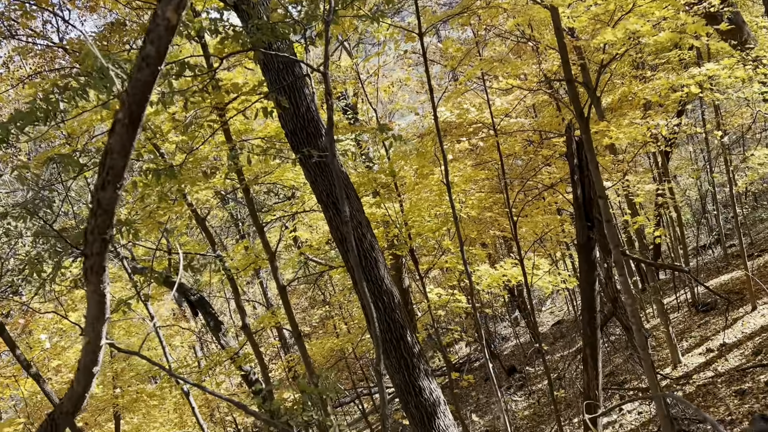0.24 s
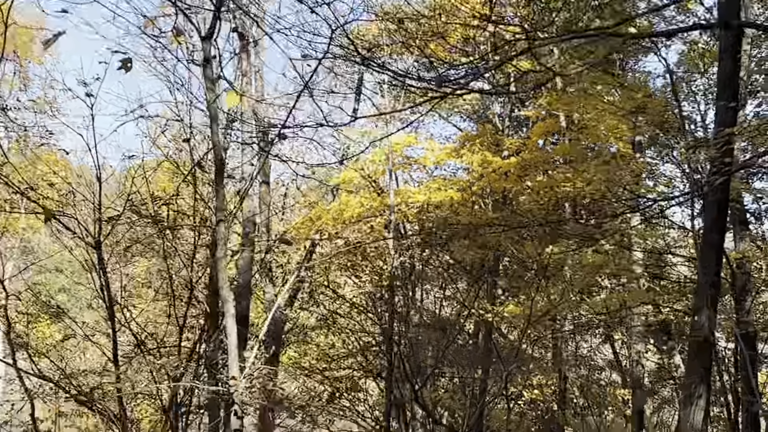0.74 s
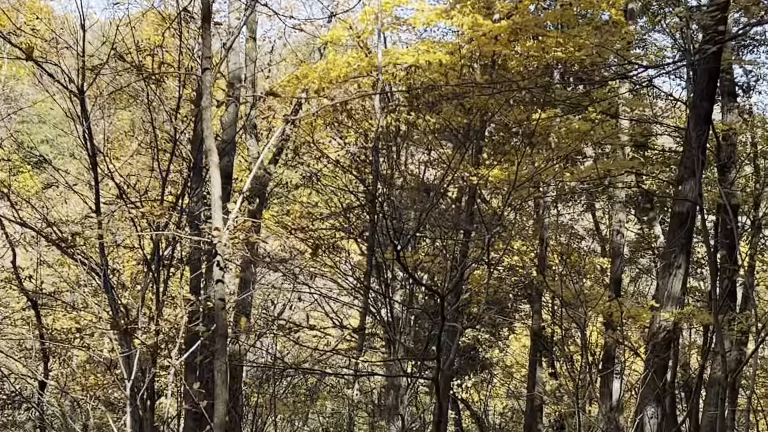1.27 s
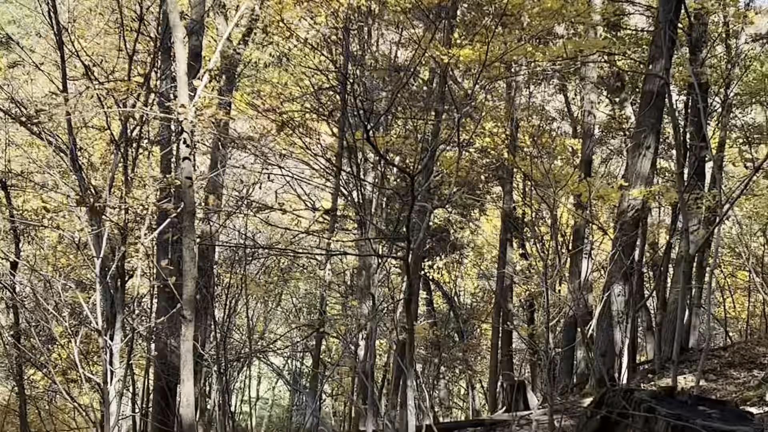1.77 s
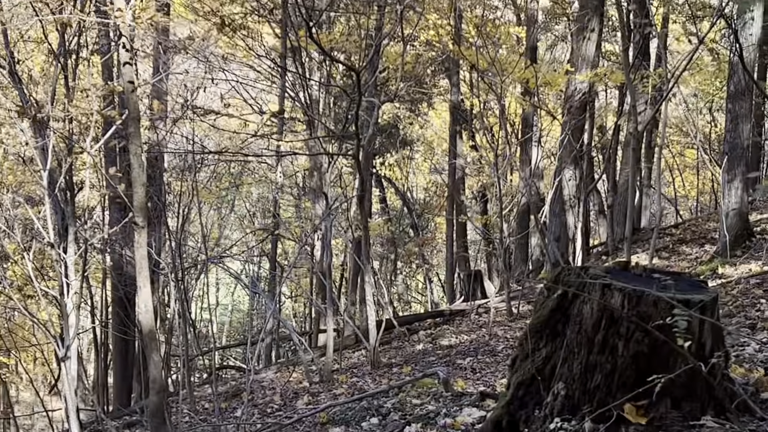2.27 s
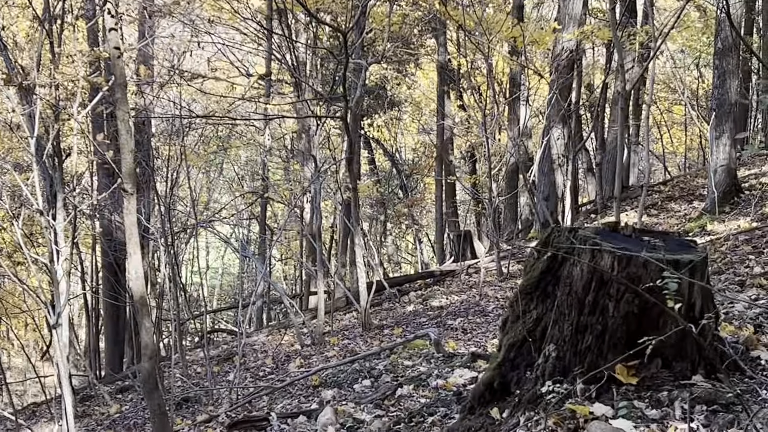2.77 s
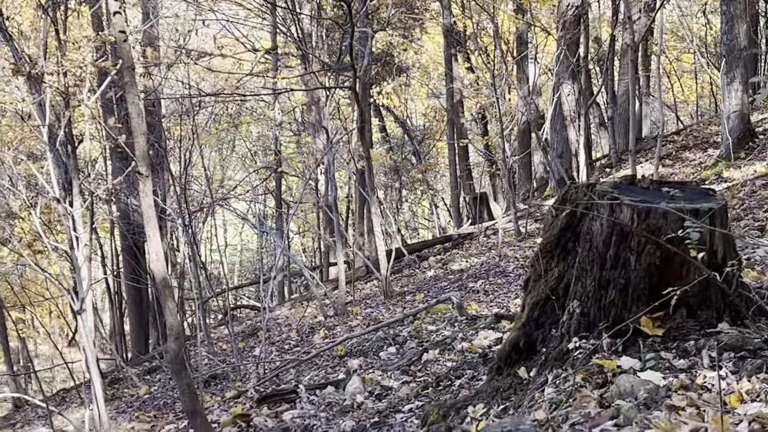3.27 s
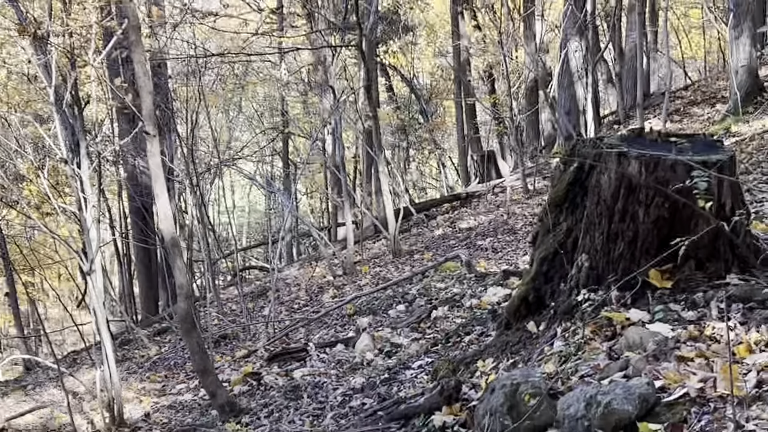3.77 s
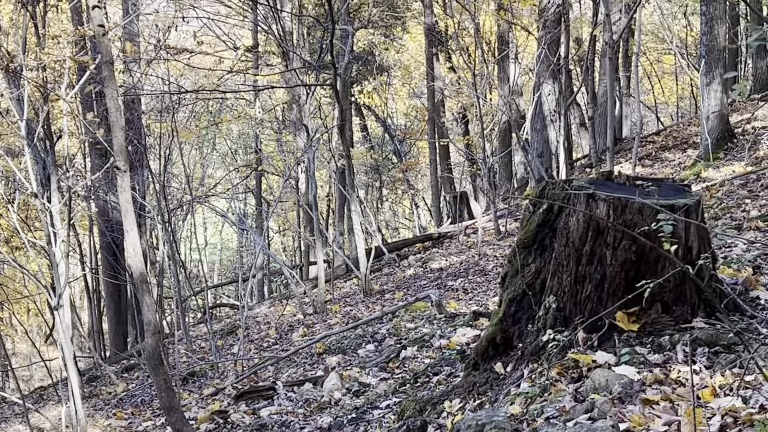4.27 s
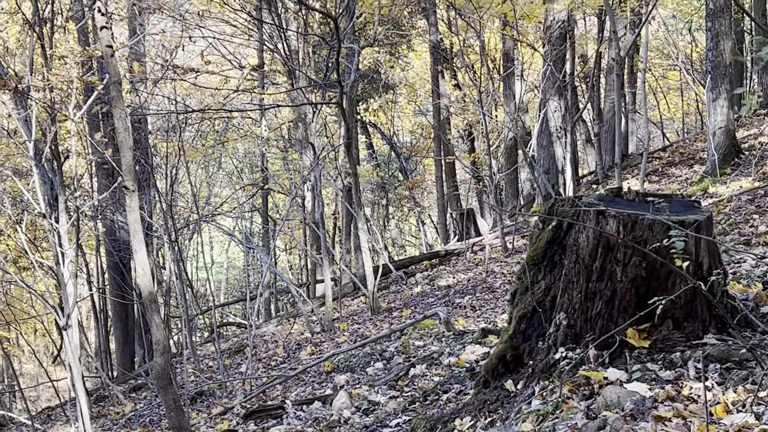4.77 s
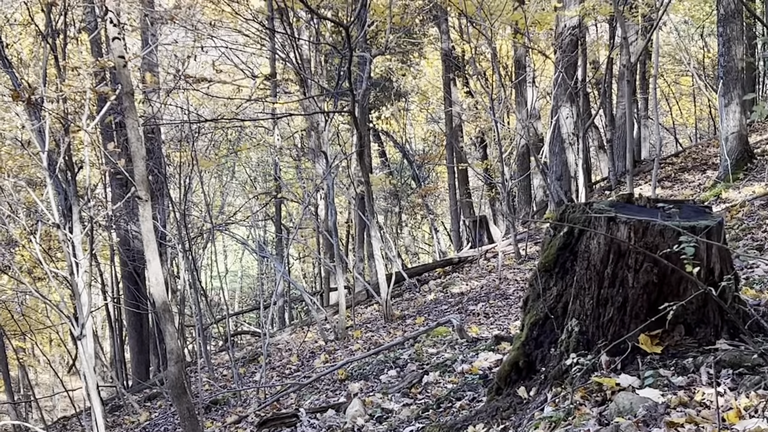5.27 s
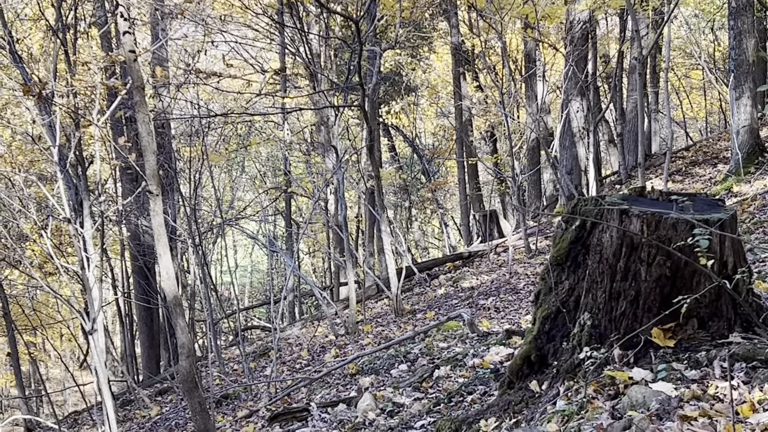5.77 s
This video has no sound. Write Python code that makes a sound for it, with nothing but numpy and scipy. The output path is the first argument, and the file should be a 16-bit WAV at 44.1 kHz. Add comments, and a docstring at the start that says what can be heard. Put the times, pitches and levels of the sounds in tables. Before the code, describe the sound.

A burst of leaf crunching, bright and wide, ends suddenly. In the hush, fingers shift on a hollow hand-held device: muffled thumps, light taps, a palm rub, fabric brushing. A strong knock and snap break the quiet, later two more strong knocks, the second snapping, with a softer bump just after. A tiny far bird note and faint ticks follow before it settles almost silent. Open woods, no audible echo, handling noise very near the microphone.

```python
"""Dry leaves rustle and crunch close by in autumn woods, and the rustle breaks off abruptly: mottled grains and
noise. In the quiet after, a sleeve brushes softly (three noise bands) and the shifting grip knocks on the
hollow case of a hand-held camera (swelling modes), twice with a sharp snap (filtered random signs). Twigs tick
(short noise bursts), a palm slides and a thin far bird note sounds (shaped noise). Faint far air and a low grip
rumble lie under the quiet (coloured noise)."""
import sys
import numpy as np
from scipy import signal
from scipy.fft import rfft, irfft, next_fast_len
from scipy.io import wavfile
from scipy.ndimage import map_coordinates

SR = 44100
rng = np.random.default_rng(int(sys.argv[2]) if len(sys.argv) > 2 else 0)


def pcm_store(signal):
    """Save signal as 16-bit PCM."""
    levels = np.round(np.clip(np.atleast_2d(signal), -1, 1) * 32767)
    wavfile.write(sys.argv[1], SR, levels.astype(np.int16).T)


N = 266364
TIME = np.arange(N) / SR

# low rumble spectrum: f/Hz, relative level/dB
RUMBLE_COLOUR = [(20, -24.5), (40, -13), (58, -8), (82, -1.5), (105, -3.5), (128, -1), (162, -12.5),
                 (200, -10.5), (245, -11.5), (320, -24), (700, -54)]
# stereo width of leaves and woody ticks: f/Hz, side re mid/dB
LEAF_WIDTH = [(60, -22), (200, -13.5), (700, -6), (1300, -3.5), (6500, -2.5), (11000, -1), (13500, -5),
              (15500, -13)]
# stereo width of the quieter sounds: f/Hz, side re mid/dB
QUIET_WIDTH = [(60, -16.5), (250, -16), (600, -8.5), (1100, -4.5), (2200, -17.5), (7000, -15.5), (11000, 1),
               (13500, -12), (15500, -5.5)]


def from_db(db):
    """Decibels to amplitude gain."""
    return 10 ** (np.asarray(db) / 20)


def rms_one(x):
    """Scale to unit power."""
    return x / np.sqrt(np.mean(x ** 2) + 1e-20)


def gains(rows):
    """One gain curve per dB column, linear in dB between the times."""
    time_s, *columns_db = np.transpose(rows)
    return [from_db(np.interp(TIME, time_s, column_db)) for column_db in columns_db]


def coloured(x, points):
    """Zero-phase filter by a (f/Hz, level/dB) curve, interpolated over log frequency."""
    hz, db = np.transpose(points)
    size = next_fast_len(N + SR // 20, real=True)
    bins_hz = np.maximum(np.arange(size // 2 + 1) * SR / size, 1)
    response = from_db(np.interp(np.log(bins_hz), np.log(hz), db))
    return irfft(rfft(x, size) * response, size)[..., :N]


def cut(x, hz, kind, order=2):
    """Causal Butterworth low- or high-pass."""
    sos = signal.butter(order, np.clip(hz, 10, .45 * SR), kind, fs=SR, output="sos")
    return signal.sosfilt(sos, x + 1e-18)


def drift(knots_per_s):
    """Slow random curve: lines between unit-variance normal knots."""
    knots = rng.standard_normal(4000)
    return np.interp(TIME * knots_per_s, np.arange(len(knots)), knots)


def hiss():
    """Two independent white noises, as mid and side."""
    return rng.standard_normal((2, N))


def grains(per_s, spread_db):
    """Tiny random fractures of uneven size, each from a direction of its own."""
    out = np.zeros((2, N))
    born = np.flatnonzero(rng.random(N) < per_s / SR)
    sizes = from_db(spread_db * np.minimum(rng.exponential(1, N), 4))
    out[:, born] = (sizes * hiss())[:, born]
    return rms_one(out)


def mottled(x, patchy_db, patches_per_s, count):
    """Narrow bands swell and sink on their own, as different leaves and fibres take turns."""
    spectrum = signal.stft(x, nperseg=512)[2]
    rows, frames = spectrum.shape[1:]
    band_place = count * np.sqrt(np.arange(rows) / rows)
    time_place = np.linspace(0, patches_per_s * N / SR, frames)
    place = np.meshgrid(band_place, time_place, indexing="ij")
    patches = map_coordinates(rng.standard_normal((count + 1, 2000)), place, order=1)
    return signal.istft(spectrum * from_db(patchy_db * patches))[1][:, :N]


def stereo(pair, colour, width):
    """Colour a mid/side pair and open it to left/right; the mid has unit power."""
    mid, side = coloured(pair, colour)
    return rms_one(mid) + coloured(rms_one(side), width) * [[1], [-1]]


def burst(start_s, decay_s):
    """Envelope that jumps to one and decays exponentially."""
    out, start = np.zeros(N), int(start_s * SR)
    age_s = TIME[:min(N - start, SR // 4)]
    out[start:start + len(age_s)] = np.exp(-age_s / decay_s)
    return out


def stroke(centre_s, half_s):
    """Envelope that swells to one and fades; half height at centre_s +/- half_s."""
    return 1 / (1 + np.square((TIME - centre_s) / half_s) ** 2)


def leaves():
    """Strides crush leaves that crackle in clumps; dull crunch and rumble of moving follow more gently."""
    # two strides: start/s, end/s, crackle level at end before waver/dB
    strides = [(-.03, 0.3, -54), (0.406, 0.573, -51)]
    # crackle spectrum: f/Hz, relative level/dB
    crackle_colour = [(900, 1.5), (2000, 0), (3200, -3.5), (4500, -4.5), (7000, -7.5), (9000, -8),
                      (12500, -9), (15500, -17)]
    # crunch spectrum: f/Hz, relative level/dB
    crunch_colour = [(200, -12), (320, 1.5), (550, 3), (900, 5.5), (1250, -8), (1700, -2), (2400, -18),
                     (5000, -61)]
    attack_s, release_s = 0.0045, 0.039
    press_db_per_s = 13  # a stride grows as the weight comes down
    crackle = from_db(-64)  # leaves dragged along between the strides
    for start_s, end_s, db in strides:
        attack = np.clip((TIME - start_s) / attack_s, 0, 1)
        release = np.exp(-np.maximum(TIME - end_s, 0) / release_s)
        press = from_db(db - press_db_per_s * np.maximum(end_s - TIME, 0))
        crackle = crackle + attack * release * press

    effort = crackle / from_db(-53)
    # exponents: share of the crackle's dB swing that is followed
    crunch = from_db(-53.5) * effort ** 0.16
    rumble = from_db(-45) * effort ** 0.34

    fractures = grains(per_s=2000, spread_db=2.5) + 0.81 * hiss()
    fractures = mottled(fractures, patchy_db=4.0, patches_per_s=59, count=55)
    crackle_waver = from_db(-1.5 + 2.1 * drift(129.3))
    balance = from_db([[.4], [-1.4]])  # left, right
    out = crackle * crackle_waver * stereo(fractures, crackle_colour, LEAF_WIDTH) * balance

    crushing = grains(per_s=2200, spread_db=-2.0)
    crushing = mottled(crushing, patchy_db=4.5, patches_per_s=51.4, count=50)
    crunch_waver = from_db(-1.15 + 0.49 * drift(82.3))
    out += crunch * crunch_waver * stereo(crushing, crunch_colour, LEAF_WIDTH)
    return out + from_db(-1.5) * rumble * stereo(hiss(), RUMBLE_COLOUR, LEAF_WIDTH)


def ticks():
    """Breaking leaves and twigs give a short splintering crack and a woody tock."""
    # breaks: t/s, crack level before trim/dB, woody body level before trim/dB
    breaks = [(0.1323, -37.5, -60), (0.184, -42, -65), (.2753, -44, -59), (0.3351, -47.5, -56),
              (.413, -47, -53.5), (.5826, -43.5, -51.5), (1.07, -66.5, -69), (1.096, -62.5, -68),
              (1.16, -61, -74), (1.2731, -60.5, -54), (1.3252, -69, -63), (1.6045, -65, -57.5),
              (3.739, -70, -66), (4.7624, -57.5, -72), (4.7945, -59, -77), (4.927, -66, -71),
              (5.1, -72, -89), (5.413, -73, -74.5), (5.5015, -67.5, -86)]
    crack_colour = [(1000, 5.5), (2400, -1.5), (7000, -2.0), (15000, -9.5)]
    body_colour = [(400, -11), (1000, 13), (1300, 10), (1900, -3.5),
                   (3200, 0.5), (4300, -12), (9000, -51.5)]
    crack = sum(from_db(crack_db) * burst(s, 0.0043) for s, crack_db, body_db in breaks)
    body = sum(from_db(body_db) * burst(s, 0.0057) for s, crack_db, body_db in breaks)
    bright = stereo(hiss(), crack_colour, QUIET_WIDTH)
    woody = stereo(hiss(), body_colour, LEAF_WIDTH)
    return from_db(-1.5) * crack * bright + from_db(6.0) * body * woody


def knocks():
    """A soft finger feeds the case modes near its pitch; each mode swells, fades and lingers faintly."""
    # case modes by family; each: f/Hz, relative level/dB, swell time to peak/s
    case_modes = {"thump": [(54.3, -7.5, 0.027), (107, 2.5, 0.015)], "hollow": [(234.7, -5, 0.0087),
                  (343.6, -1, 0.0076)], "knock": [(460.7, 1.5, 0.0062), (705, -8, 0.0071)],
                  "ring": [(643, 1.5, 0.0058)], "rap": [(932, -5, 0.003), (1286, 0, .0038),
                  (1508, -2, 0.0044)]}
    # finger contacts: t/s, strength/dB, most-fed pitch/Hz, fall below pitch/(dB/octave),
    # boost of the "knock" family by the spot hit/dB
    contacts = [(.439, -43.5, 643, 12.5, -16), (.9, -56, 587, 12, -12), (1.093, -48.5, 121, 1.5, 0),
                (1.136, -53.5, 240, 2.1, 5), (1.208, -51.5, 280, 2.2, 0.5), (1.324, -54, 110, 1, 7),
                (1.408, -49.5, 109, 1.5, 2), (1.505, -38.5, 240, 4.5, -15), (1.85, -51, 315, 6, 9.5),
                (2.2065, -21, 398, 3.5, -22.5), (2.233, -26, 218, 3, -6.5), (2.895, -56.5, 577, 3.5, -5),
                (3.007, -53.5, 346, 2.5, -7), (3.559, -57.5, 517, 3, -10), (3.6406, -20.5, 538, 6, -2.5),
                (3.655, -31.5, 334, 6, -12.5), (3.747, -53, 1017, 4.5, 0.5), (3.8483, -22, 731, 3.5, 8),
                (3.873, -30.5, 148.2, 2, 15), (4.075, -44.5, 640, 2.5, 16), (4.082, -28.5, 643, 11, -6.5),
                (4.088, -38, 107, 4, -0.5), (4.099, -36.5, 622, 13, -1), (4.183, -52.5, 110, 2, 7),
                (4.657, -54.5, 380, 7, 2), (4.847, -57.5, 643, 12.5, -19), (5.234, -51, 521, 6, 4.5)]
    upper_fall = 3.8  # slope above pitch re slope below
    out, age_s = np.zeros(N), TIME[:SR // 3]
    for family, modes in case_modes.items():
        for hz, db, swell_s in modes:
            swell = (age_s / swell_s * np.exp(1 - age_s / swell_s)) ** 2
            linger = from_db(-32.0) * (1 - np.exp(-age_s / swell_s)) * np.exp(-age_s / 0.042)
            ring = from_db(db) * (swell + linger) * np.sin(2 * np.pi * hz * age_s)
            for s, strength_db, pitch_hz, fall_db, spot_db in contacts:
                octaves = np.log2(hz / pitch_hz)
                fed_db = strength_db - fall_db * max(-octaves, upper_fall * octaves)
                fed_db += spot_db * (family == "knock")
                start = int(s * SR)
                out[start:start + len(age_s)] += from_db(fed_db) * ring
    # the two ports feel the bass alike and the upper modes out of step
    side_colour = [(50, -14.0), (100, -20.5), (350, -18.0), (460, -10.0), (640, -7.0), (1300, -9.5)]
    side = coloured(signal.hilbert(out).imag, side_colour)
    return out + side * [[1], [-1]]


def quiet_woods():
    """The hand rumbles on the case and far air murmurs, as wavering noise over a faint steady hiss."""
    # background: t/s, rumble level before trim/dB, airy murmur level before trim/dB
    background = [(0.66, -74.5, -73.5), (0.76, -76, -75), (0.96, -70.5, -73.5), (1.23, -61, -69.5),
                  (1.77, -71, -69.5), (2.12, -67.5, -66), (2.29, -70.5, -71), (2.53, -73, -71),
                  (2.84, -75.5, -67.5), (3.22, -75.5, -68.5), (3.8, -69.5, -67.5), (3.92, -72, -68),
                  (4.04, -69, -74), (4.49, -75.5, -71), (4.76, -71, -71.5), (5.07, -75.5, -73),
                  (5.57, -82, -80.5), (6.03, -79, -75.5)]
    # murmur spectrum: f/Hz, relative level/dB
    air_colour = [(120, -11.5), (260, -8), (380, 3), (620, -2.5), (800, -5), (950, -5.5), (1120, -16.5),
                  (1400, -13.5), (2000, -32.5), (4000, -57.5)]
    # hiss spectrum: f/Hz, relative level/dB
    hiss_colour = [(150, -7.5), (600, -2), (1000, 3), (1400, 4.5), (2000, -8), (3000, -15), (7000, -18),
                   (9000, -23), (13000, -22), (15500, -34.5)]
    grip, air = gains(background)
    grip_waver = from_db(4.0 + 3.5 * drift(11))
    out = grip_waver * grip * stereo(hiss(), RUMBLE_COLOUR, QUIET_WIDTH)
    air_waver = from_db(2 + 1.5 * drift(23))
    out += air_waver * air * stereo(hiss(), air_colour, QUIET_WIDTH)
    return out + from_db(-77) * stereo(hiss(), hiss_colour, QUIET_WIDTH)


def sleeve():
    """Strokes swell and fade while fibres catch and let go; brightness tilts three grains of noise."""
    # strokes: centre t/s, half length/s, level before grain offset and trim/dB, brightness/(dB/grain band)
    brushes = [(0.693, 0.069, -79, -3), (.88, 0.041, -80, -5), (1.215, 0.065, -82, -6.5),
               (1.355, 0.034, -70, -2), (1.553, 0.081, -77.5, -8), (1.772, 0.046, -79, 6),
               (1.9, .04, -89.5, -17.5), (2.728, 0.057, -88.5, 5), (3.025, .04, -82, -7),
               (3.2, 0.05, -76.5, -7), (3.384, 0.05, -80.5, -14.5), (3.59, 0.12, -89.5, -15),
               (4.764, .058, -76, 1), (4.955, 0.04, -73.5, -3), (5.046, .055, -74.5, 2.5),
               (5.21, 0.089, -86.5, 6.5), (5.426, .035, -86, -6), (5.555, .025, -88.5, -10),
               (5.792, .018, -84.5, 3.5), (5.977, 0.036, -76, -9)]
    # coarse, middle and fine grain: low f/Hz, high f/Hz
    grain_bands = [(1200, 3000), (4700, 8200), (11400, 15000)]
    # offset of each grain: level/dB
    grain_db = [1.5, 0.5, 0]
    out = 0
    strokes = [(stroke(centre_s, half_s), db, bright_db) for centre_s, half_s, db, bright_db in brushes]
    fibres = hiss() + 0.95 * grains(per_s=1000, spread_db=3.5)
    fibres = mottled(fibres, patchy_db=4.0, patches_per_s=22, count=60)
    for step, (low_hz, high_hz) in enumerate(grain_bands):
        level = 0
        for shape, db, bright_db in strokes:
            level = level + from_db(db + grain_db[step] + (step - 1) * bright_db) * shape
        band = [(low_hz / 1.5, -20), (low_hz, 0), (high_hz, -3), (high_hz * 1.55, -22)]
        out = out + level * stereo(fibres, band, QUIET_WIDTH)
    return out * from_db(-5.0 + 1.0 * drift(54))


def slides():
    """The sliding palm rubs the case's low resonances: noise shaped to their spectrum."""
    # palm slides: centre t/s, half length/s, level/dB
    rubs = [(1.945, 0.046, -63), (2.78, .07, -67), (3.426, .022, -58), (4.19, 0.11, -60.5),
            (5.261, 0.054, -64)]
    # rub spectrum: f/Hz, relative level/dB
    rub_colour = [(60, -12), (105, 3), (170, -13.5), (350, -4.5), (460, 2.5), (550, -5), (645, 0.5),
                  (760, -14), (1400, -19.5), (2500, -48)]
    level = sum(from_db(db) * stroke(centre_s, half_s) for centre_s, half_s, db in rubs)
    return level * stereo(hiss(), rub_colour, QUIET_WIDTH)


def snaps():
    """A hard catch cracks briefly, as filtered random signs, and leaves a faint scatter behind."""
    # snaps of the case: t/s, drive before filters/dB, low-pass edge f/Hz, decay/s
    catches = [(2.2049, -21, 1480, 0.00045), (2.2058, -12.5, 1380, 0.0009), (2.209, -37, 2500, 0.0007),
               (2.2252, -54.5, 4800, 0.00064), (3.641, -48.5, 990, 0.0056), (3.852, -19, 8000, 0.00046),
               (3.855, -41, 1000, .008)]
    # snap spectrum: f/Hz, gain/dB
    snap_colour = [(1000, -11.5), (1500, 3), (2000, 1.5), (2700, 7), (4500, -2.5), (7200, -0.5),
                   (9500, -4.5), (13000, -0.5), (16000, -1)]
    out = 0
    for s, db, edge_hz, decay_s in catches:
        scatter = from_db(-30.5) * burst(s, 0.0079) + from_db(-45.5) * burst(s, 0.047)
        envelope = burst(s, decay_s) + scatter
        out = out + from_db(db) * cut(envelope * np.sign(hiss()), edge_hz, "low", order=1)
    mid, side = coloured(cut(out, 610.0, "high"), snap_colour)
    return mid + from_db(-12.0) * side * [[1], [-1]]


def bird():
    """A thin high note, blurred by the trees into a narrow noise band."""
    # far bird note: t/s, level/dB
    note = [(4.63, -105), (4.68, -75.5), (4.75, -78), (4.79, -81), (4.82, -110)]
    note_colour = [(5200, -72.0), (6500, -12), (7000, -7.5), (7500, -15.5), (8800, -74.5)]
    level, = gains(note)
    return level * stereo(hiss(), note_colour, QUIET_WIDTH)


def scene():
    """The rustle gives way to the quiet; the other sounds add to both."""
    rustle_end_s, fade_s = .624, 0.0033
    rustling = np.clip((rustle_end_s - TIME) / fade_s, 0, 1)
    ground = rustling * leaves() + (1 - rustling) * quiet_woods()
    return ground + ticks() + knocks() + sleeve() + slides() + snaps() + bird()


def record(dry):
    """The microphone ports cancel a treble band in the middle of the image; the top is cut."""
    # mid response of the ports: f/Hz, gain/dB
    ports = [(8300, -1.5), (9200, -11), (10000, -26.5), (10700, -9.5), (11600, -1.5), (13200, 1.5),
             (14600, -3), (16000, -1.5)]
    mid = coloured((dry[0] + dry[1]) / 2, ports)
    side = (dry[0] - dry[1]) / 2
    top_cut = signal.ellip(10, .2, 80, 16000, fs=SR, output="sos")  # low-pass, edge in Hz
    return signal.sosfilt(top_cut, mid + side * [[1], [-1]])


dry = scene()
out = record(dry)
pcm_store(out)
```